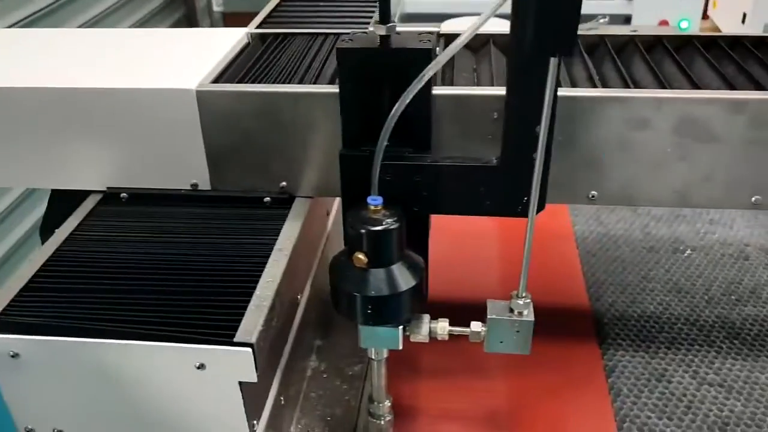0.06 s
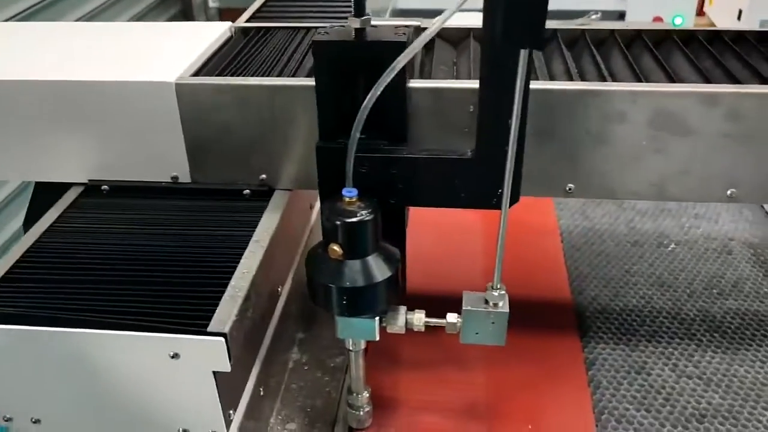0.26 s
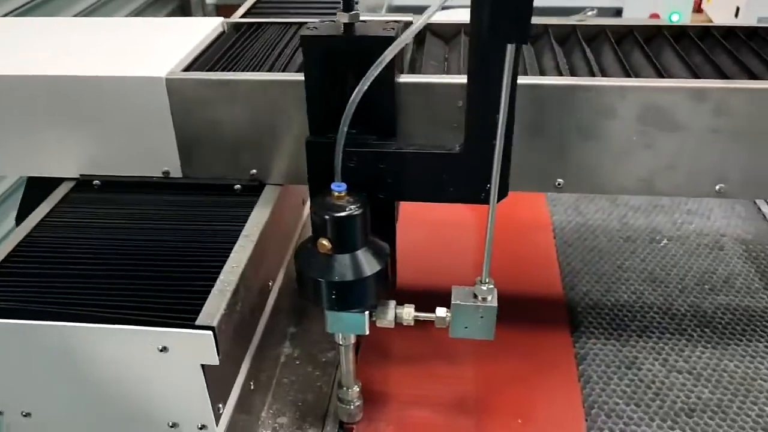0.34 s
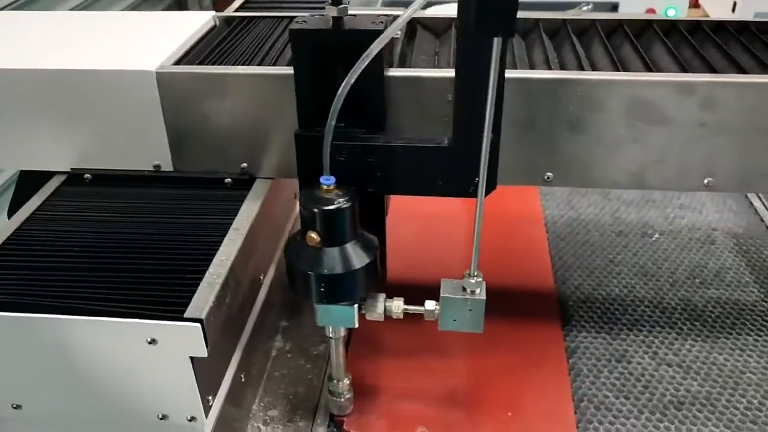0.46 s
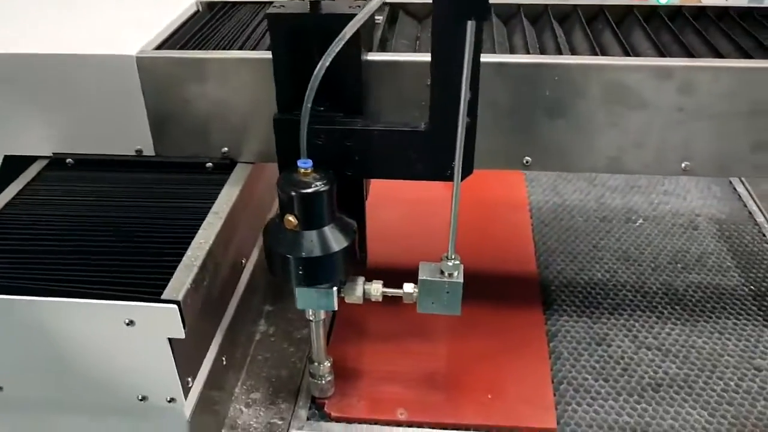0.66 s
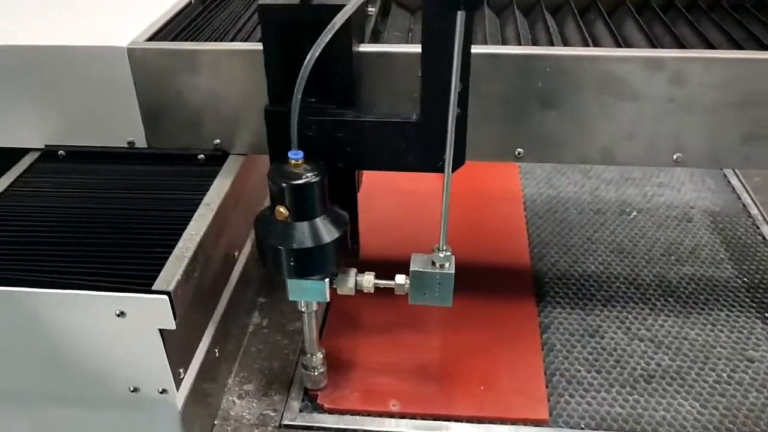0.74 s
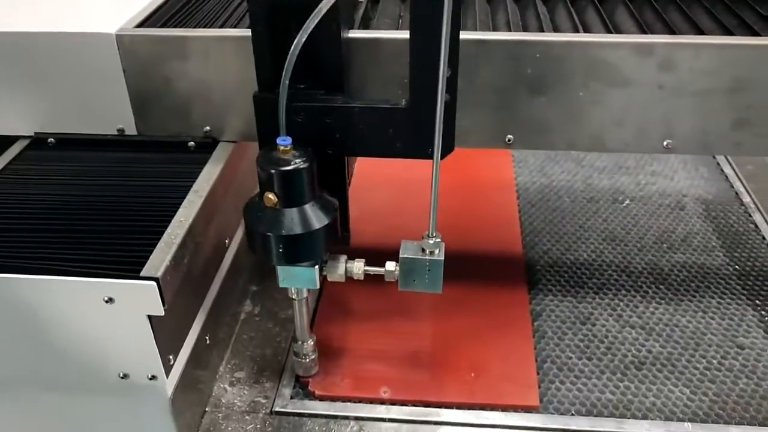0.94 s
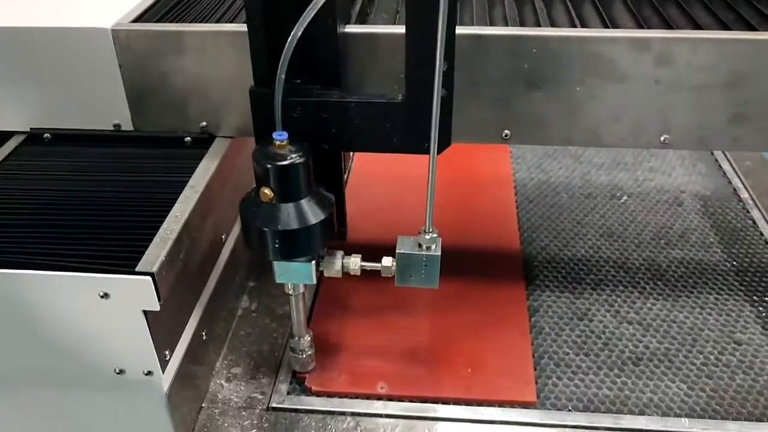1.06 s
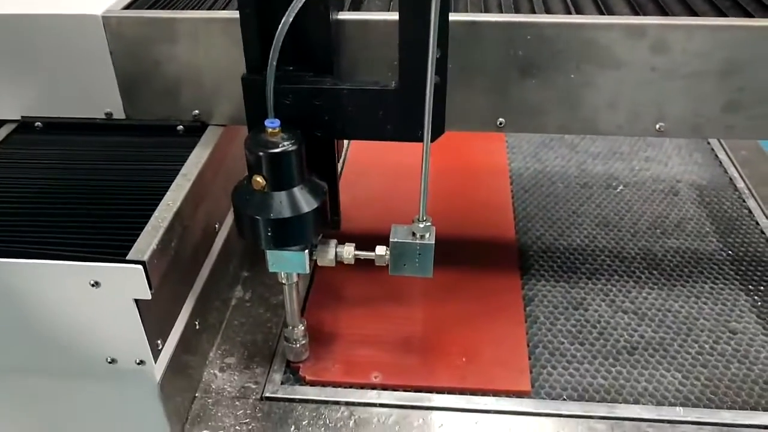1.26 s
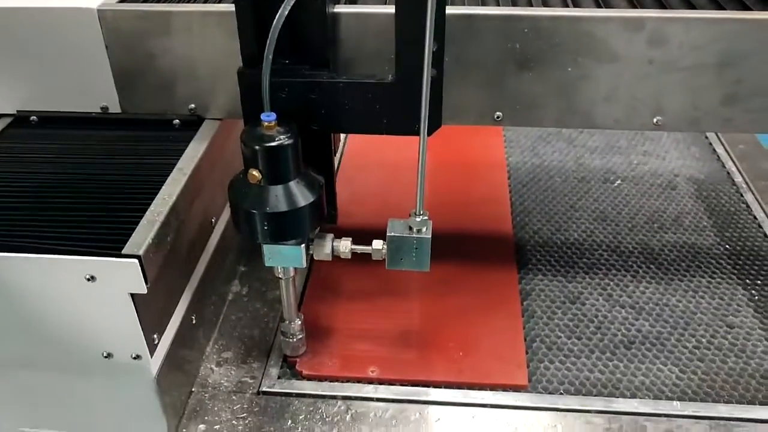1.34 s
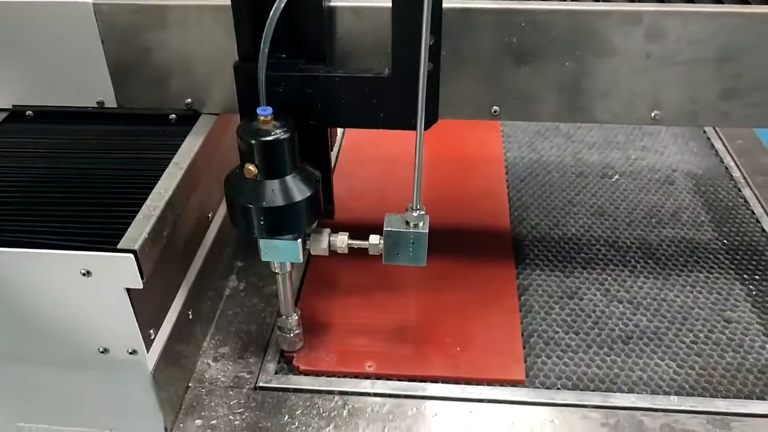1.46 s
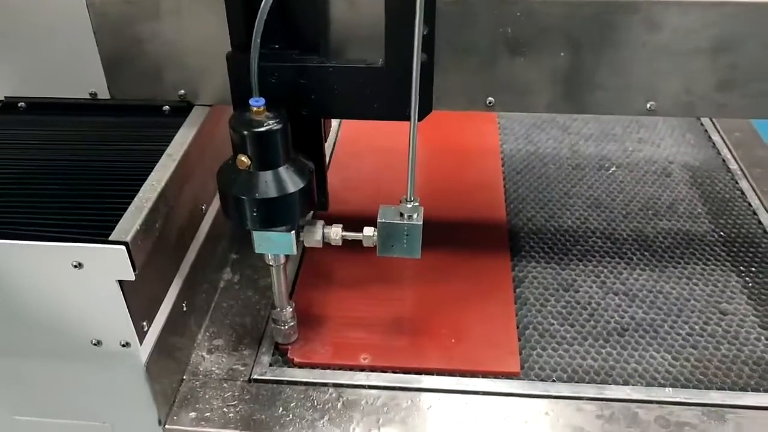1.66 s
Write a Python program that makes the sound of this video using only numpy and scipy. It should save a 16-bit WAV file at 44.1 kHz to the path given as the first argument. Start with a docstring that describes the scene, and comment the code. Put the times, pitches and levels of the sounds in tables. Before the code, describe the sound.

A high-pressure water jet spits open, hisses and dies away as workshop motors hum.

```python
"""Pump motors hum and a drive whines in a workshop; at 0.2 s a water jet spits open close by.
The cutting head stands over a sheet on the tank grate. Turbulence and droplets make the jet hiss;
it rings the grate and churns the tank, then dulls and dies away to a thin spray.
The hum and whine go on throughout, over pump rumble and fan noise."""
import sys
import numpy as np
from scipy import signal
from scipy.fft import rfft, irfft
from scipy.io import wavfile

SR = 44100
rng = np.random.default_rng(int(sys.argv[2]) if len(sys.argv) > 2 else 0)


def pcm_store(signal):
    """Save signal as 16-bit PCM."""
    levels = np.round(np.clip(np.atleast_2d(signal), -1, 1) * 32767)
    wavfile.write(sys.argv[1], SR, levels.astype(np.int16).T)


N = 74970


def undb(db):
    """Decibels to gain."""
    return 10 ** (np.asarray(db) / 20)


def unit(x):
    """Scale to rms 1."""
    return x / np.sqrt(np.mean(x ** 2))


def curve(rows):
    """Join (time [s], value) rows by straight lines."""
    return np.interp(np.arange(N) / SR, *np.array(rows).T)


def colour_at(rows, hz):
    """Read (frequency [Hz], gain [dB]) rows on a log-frequency axis."""
    row_hz, row_db = np.array(rows).T
    return np.interp(np.log(np.maximum(hz, 1)), np.log(row_hz), row_db)


def shape(x, rows):
    """Filter by (frequency [Hz], gain [dB]) rows; output rms 1."""
    gain = undb(colour_at(rows, np.fft.rfftfreq(N, 1 / SR)))
    return unit(irfft(rfft(x) * gain, N))


def walk(rate_hz):
    """Smooth random wander, rms 1."""
    bin_hz = np.fft.rfftfreq(N, 1 / SR)
    return unit(irfft(rfft(rng.standard_normal(N)) / (1 + (bin_hz / rate_hz) ** 2) ** 2, N))


def fans():
    """Fans and workshop air: broad, wavering noise."""
    # air noise spectrum (frequency [Hz], relative density [dB])
    colour = [(40, -12), (250, -10.5), (450, -15), (800, -16), (1080, -17.5), (1300, -20), (2200, -24),
              (4500, -29), (8100, -28.5), (8700, -38.5), (12000, -43.5), (15500, -55)]
    level_db, waver_db = -49, 1.77
    return shape(rng.standard_normal(N), colour) * undb(level_db + waver_db * walk(26))


def pump():
    """Low rumble of the pump."""
    # rumble envelope (time [s], level [dB])
    envelope = [(0, -48), (0.8, -51), (1.25, -45), (1.7, -47)]
    # rumble spectrum (frequency [Hz], relative density [dB])
    colour = [(12, -13), (27, 9.5), (37, -5.5), (60, -0.5), (90, -6), (125, -10), (165, -11), (300, -27),
              (1000, -56)]
    return shape(rng.standard_normal(N), colour) * undb(curve(envelope))


def motors():
    """Pump motors hum; each tone wavers in pitch and level."""
    # motor tones (frequency [Hz], start level [dB], end level [dB])
    tones = [(246, -67, -61.5), (351.5, -56.5, -60.5), (466.5, -63, -61.5), (498, -61, -63),
             (587, -64, -59.5), (755, -58.5, -79), (934, -56, -66), (1057, -62.5, -57), (1167, -83, -64),
             (3740, -72, -68)]
    drift_hz, waver_db = 1.78, 1
    hum = 0
    for hz, start_db, end_db in tones:
        cycles = np.cumsum(hz + drift_hz * walk(9)) / SR + rng.random()
        level_db = np.linspace(start_db, end_db, N) + waver_db * walk(24)
        hum += np.sqrt(2) * np.sin(2 * np.pi * cycles) * undb(level_db)
    return hum


def drive():
    """Thin drive whine: one jittering tone at a steady level."""
    whine_hz, jitter_hz, level_db = 7960, 16, -61.5
    cycles = np.cumsum(whine_hz + jitter_hz * walk(200)) / SR
    return np.sqrt(2) * np.sin(2 * np.pi * cycles) * undb(level_db)


def room(x):
    """Add short reflections from the gantry and walls."""
    t60_s, tail_db = 0.39, -13
    time_s = np.arange(N) / SR
    tail = rng.standard_normal(N) * np.exp(-np.log(1000) * time_s / t60_s)
    tail /= np.sqrt(np.sum(tail ** 2))
    return x + undb(tail_db) * signal.fftconvolve(x, tail)[:N]


def tank():
    """The jet churns the water under the sheet."""
    # churn envelope (time [s], level [dB])
    envelope = [(0.19, -72), (0.25, -44), (0.39, -40.5), (0.6, -47), (0.8, -39.5), (1.0, -44), (1.3, -54),
                (1.7, -79)]
    # churn spectrum (frequency [Hz], relative density [dB])
    colour = [(60, -9), (120, -14), (160, 2.5), (200, -8.5), (290, -6.5), (350, 5), (420, -12.5),
              (600, -5.5), (760, -3.5), (1000, -11), (1600, -2), (4000, -38)]
    return shape(rng.standard_normal(N), colour) * undb(curve(envelope))


def ring(x, hz, width_hz):
    """One resonance; white noise keeps its level through it."""
    pole = np.exp((2j * np.pi * hz - np.pi * width_hz) / SR)
    return signal.lfilter([np.sqrt(2 * (1 - abs(pole) ** 2))], [1, -pole], x).imag


def grate(strength):
    """Random blows from the jet ring the grate and sheet."""
    # resonances (frequency [Hz], width [Hz], relative level [dB])
    modes = [(2173, 65, -1.5), (2299, 60, 1.5), (2655, 34, -5.5), (3090, 17, -22), (2928, 25, -0.5),
             (3210, 76, 0), (3430, 25, -17), (3470, 23, 1), (4950, 30, -5.5), (4830, 30, -8),
             (5340, 28, -5), (4960, 11, -8)]
    gain_db = -7.5
    blows = rng.standard_normal(N) * strength
    ringing = sum(undb(db) * ring(blows, hz, width_hz) for hz, width_hz, db in modes)
    return undb(gain_db) * ringing / np.sqrt(len(modes))


def droplets():
    """Droplet impacts: random clicks of either sign, rms 1."""
    rate_per_s, spread_db = 2900, 1
    hits = rng.random(N) < rate_per_s / SR
    signs = rng.choice([-1, 1], N)
    sizes = undb(spread_db * np.minimum(rng.exponential(size=N), 5))
    return unit(hits * signs * sizes)


def hiss():
    """Turbulence and droplets: a flickering hiss, bright at first, dull later."""
    # full-strength spectrum (frequency [Hz], relative density [dB])
    colour = [(100, -25), (600, -30), (1100, -19.5), (1420, -16), (1530, -8.5), (1630, -20), (1900, -3),
              (2130, -2), (2400, -2), (2640, 2), (2740, -7.5), (2840, -1), (3500, -1.5), (3900, -1),
              (5200, -1.5), (5500, -2.5), (8100, 0), (9000, -4.5), (10200, -8.5), (12500, -10.5),
              (15800, -21)]
    # thin, bright spit as the valve opens (frequency [Hz], change [dB])
    spit = [(1500, -7), (2100, -2.5), (2900, -6), (4200, -1), (5200, 8.5), (8000, -0.5), (11000, 6.5),
            (15500, 6.5)]
    # treble loss of the weakened jet (frequency [Hz], change [dB])
    dulling = [(1500, 2), (4000, 0.5), (6000, -3.5), (7900, -7.5), (8800, -23), (11500, -21.5),
               (15000, -39)]
    droplet_db, flicker_hz, flicker_db = -4.5, 30.8, 2.06
    spit_mix = curve([(0.17, 1), (0.28, 0)])
    dull_mix = curve([(0.61, 0), (1.315, 1)])
    rush = undb(droplet_db) * droplets() + rng.standard_normal(N)
    spectrum = rfft(shape(rush, colour))
    bin_hz = np.fft.rfftfreq(N, 1 / SR)
    centres_hz = np.geomspace(1000, 16000, 17)
    out = 0
    for hz, weights in zip(centres_hz, np.eye(len(centres_hz))):
        band = irfft(spectrum * np.interp(bin_hz, centres_hz, weights), N)
        change_db = spit_mix * colour_at(spit, hz) + dull_mix * colour_at(dulling, hz)
        out += band * undb(change_db + flicker_db * walk(flicker_hz))
    return out


def jet():
    """The jet's fluttering strength drives both the hiss and the grate."""
    # jet strength (time [s], level [dB])
    envelope = [(0.193, -75), (0.199, -37), (0.21, -31), (0.232, -25.5), (0.265, -25), (0.278, -21),
                (0.33, -20.5), (0.364, -19.5), (0.405, -20), (0.47, -20), (0.495, -20.5), (0.517, -17),
                (0.536, -19.5), (0.64, -20), (0.705, -19), (0.75, -20.5), (0.822, -21), (0.834, -23),
                (0.944, -25.5), (0.968, -29), (1.065, -31.3), (1.09, -35), (1.15, -35.5), (1.21, -38),
                (1.3, -40), (1.33, -44), (1.7, -55)]
    flutter_hz, flutter_db = 110, 0.5
    strength = undb(curve(envelope) + flutter_db * walk(flutter_hz))
    return hiss() * strength + grate(strength)


def scene():
    """Machines, tank and jet, the same in both channels."""
    mono = fans() + pump() + motors() + drive() + tank() + room(jet())
    return np.array([mono, mono])


def record(dry):
    """The phone cuts the top with a steep low-pass."""
    cutoff_hz = 15750
    return signal.sosfilt(signal.ellip(14, .1, 80, cutoff_hz, fs=SR, output="sos"), dry)


dry = scene()
out = record(dry)
pcm_store(out)
```